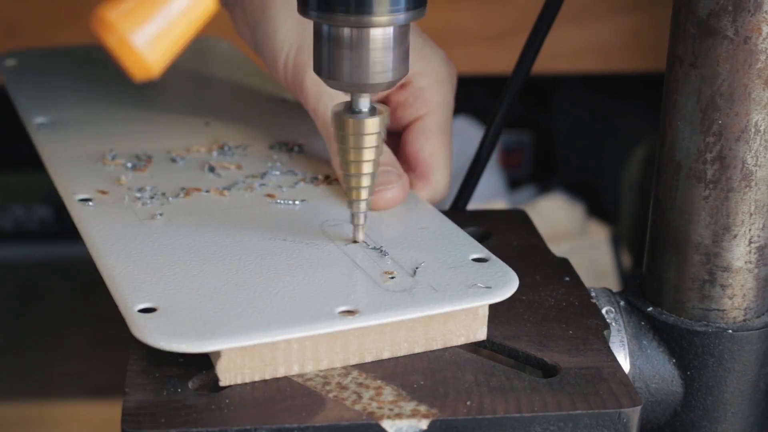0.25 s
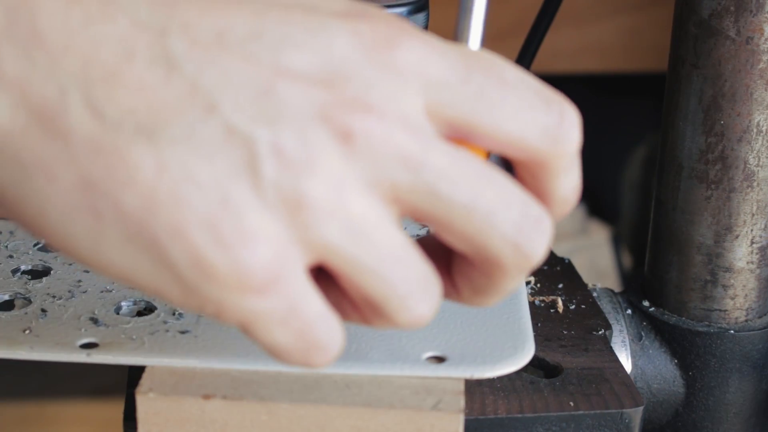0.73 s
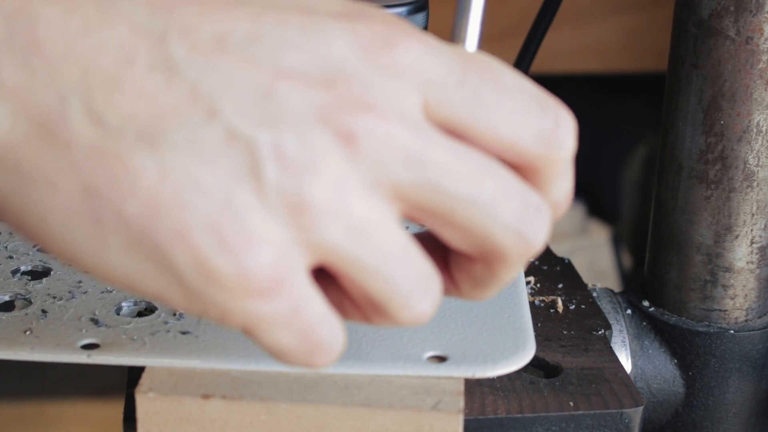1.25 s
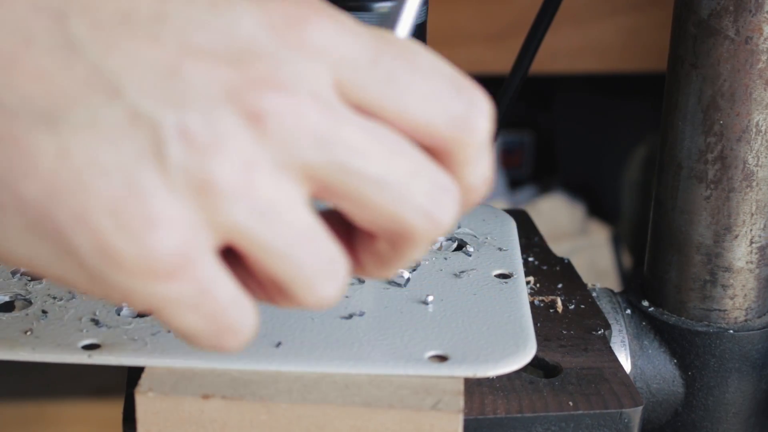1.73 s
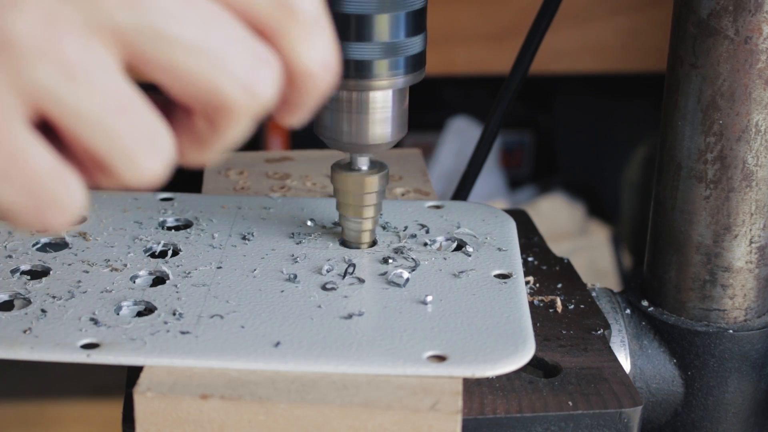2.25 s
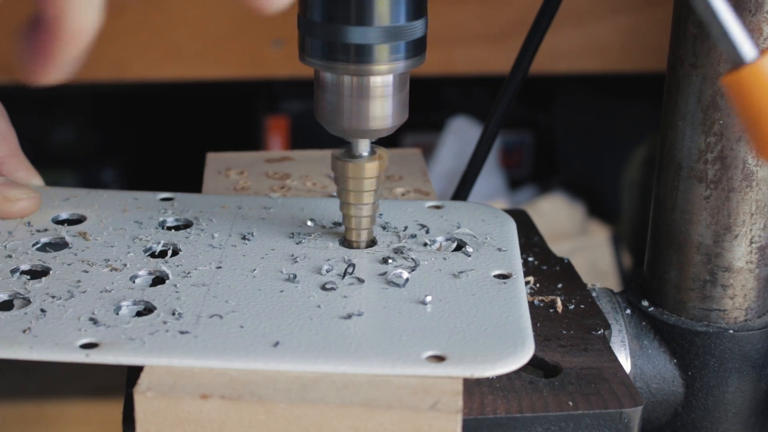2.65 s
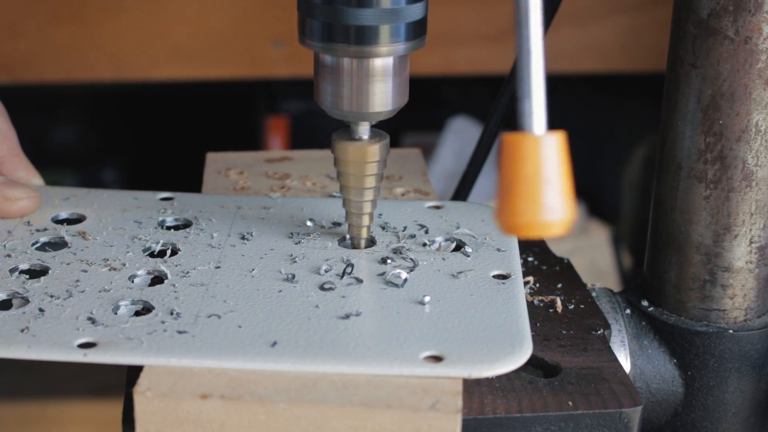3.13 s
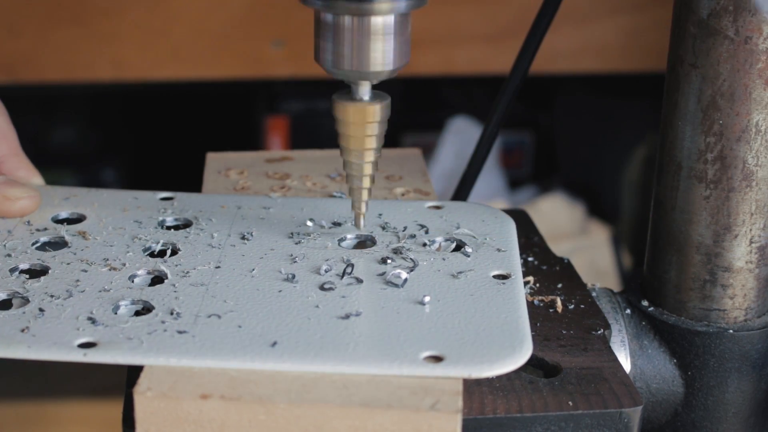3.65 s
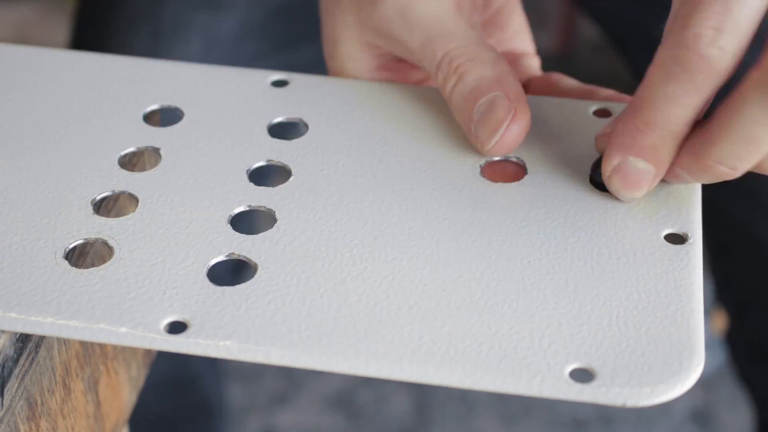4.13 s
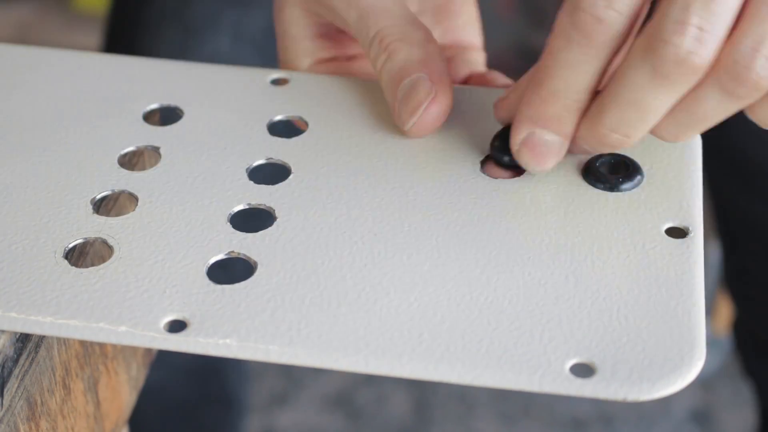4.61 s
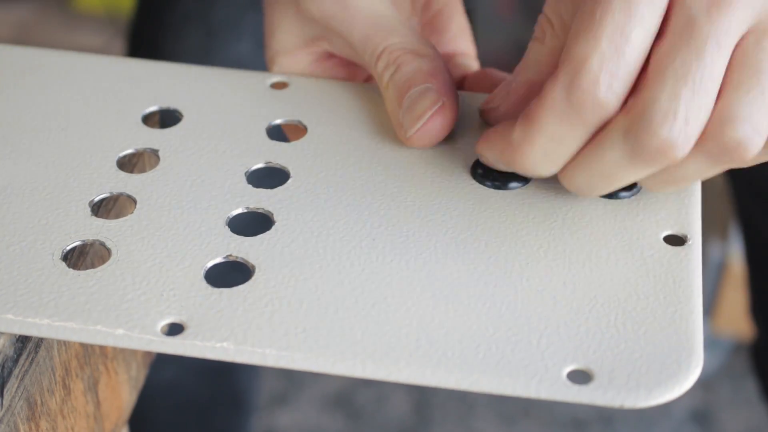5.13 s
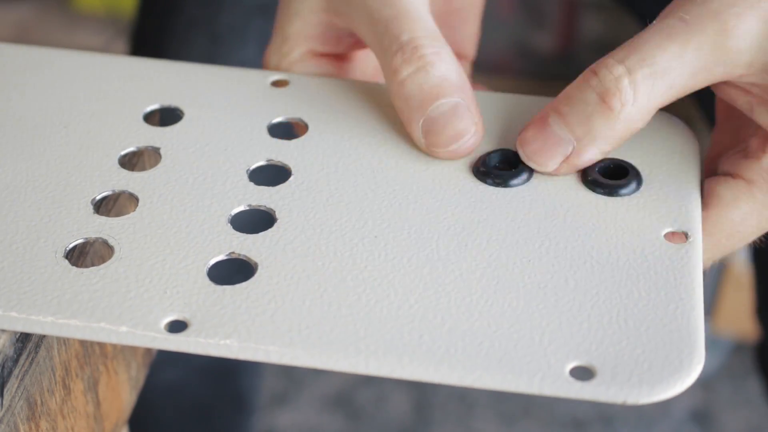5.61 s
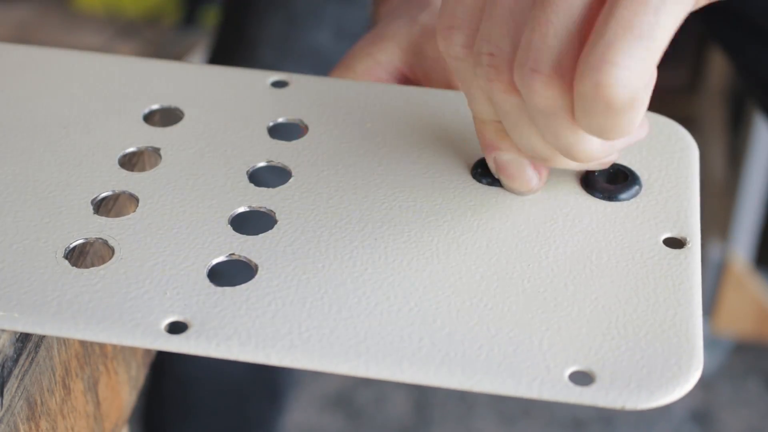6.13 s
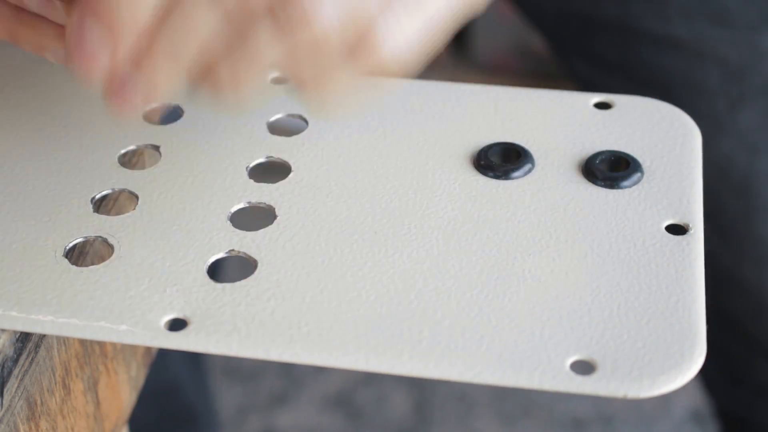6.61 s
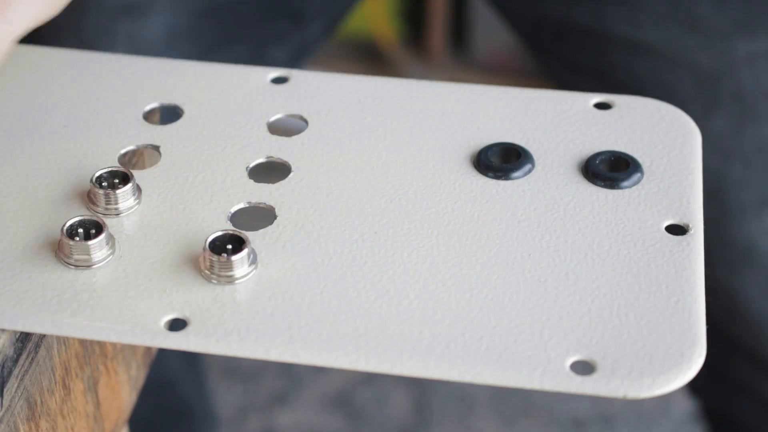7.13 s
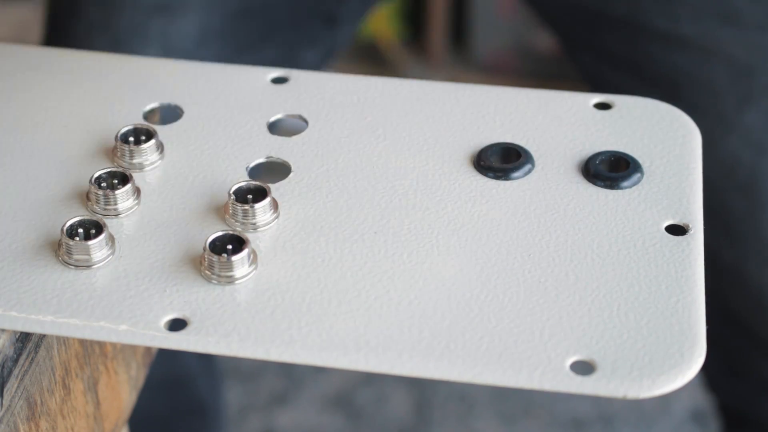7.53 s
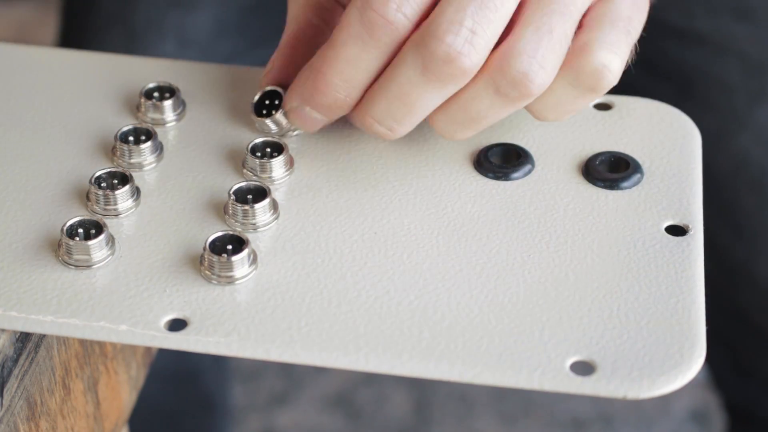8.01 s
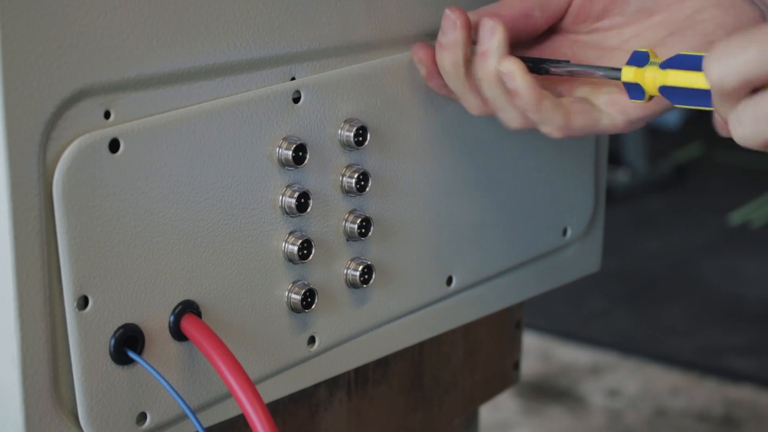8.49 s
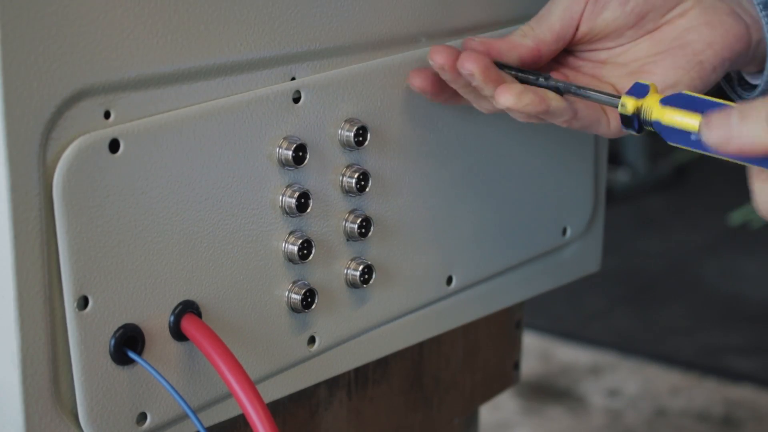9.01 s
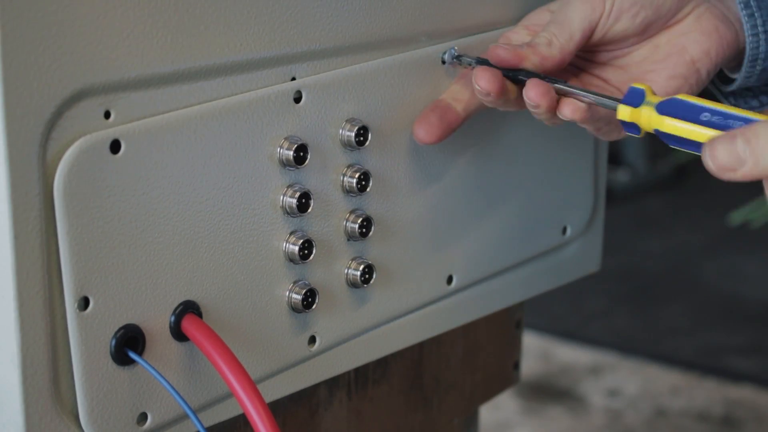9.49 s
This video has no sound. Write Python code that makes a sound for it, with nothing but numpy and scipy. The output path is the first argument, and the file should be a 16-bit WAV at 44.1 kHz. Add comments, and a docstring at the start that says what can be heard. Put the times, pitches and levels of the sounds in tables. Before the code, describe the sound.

In a small workshop, closely miked, a thin high whine gives way to a humming drill press. Its stepped bit tears harshly through thin steel in fast pulses, then chatters and rattles in the hole. The machine cuts off abruptly. In near-quiet come faint dry rubber ticks, a spaced run of bright metal clinks, and one hard knock on a hollow steel cabinet, followed by soft dull bumps.

```python
"""A small workshop with a bench drill press: a brief high whine, then the motor hums while a stepped bit
tears through a thin steel panel and rattles in the hole, until the machine sound ends abruptly.
Rubber grommets tick into the holes, metal sockets clink into place, and the panel knocks on a hollow cabinet.
Tones are sine waves; scraping, tearing and knocking are bursts of grainy noise coloured by the objects they shake."""
import sys
import numpy as np
from scipy import signal
from scipy.fft import rfft, irfft
from scipy.io import wavfile

SR = 44100
rng = np.random.default_rng(int(sys.argv[2]) if len(sys.argv) > 2 else 0)


def int16_out(signal):
    """Quantize to a 16-bit WAV file."""
    q = np.round(np.clip(np.atleast_2d(signal).T, -1, 1) * 32767)
    wavfile.write(sys.argv[1], SR, q.astype(np.int16))


N = 429959
T = np.arange(N) / SR   # time of every sample [s]

WHINE_END_S, DRILL_END_S, CABINET_S = 0.36, 4.082, 8.39
TURN_S = 0.1041        # one turn of the spindle
BIT_CLEAR_S = 3.85     # the bit is lifted clear of the hole

# Running machine: (time [s], hum level [dB rms], bearing noise level before trim [dB])
MACHINE_LEVELS = [(0.38, -46, -41), (0.75, -49, -35), (1.2, -58.5, -41), (1.47, -54, -45), (1.75, -50, -41),
                  (1.95, -46.5, -39.5), (3.5, -48, -39.5), (3.93, -53, -41), (4.06, -48.5, -40)]
# Resonances of the cast frame: (frequency [Hz], width [Hz], relative level [dB])
FRAME_MODES = [(177, 90, -10), (232, 32, -7), (462.3, 140, 1), (604.6, 72, -4.5), (904.3, 13, -13.5),
               (1536, 30, -15)]
# How hard the edge scrapes the steel as the bit is fed: (time [s], level [dB])
FEED = [(0.66, -55.5), (0.695, -44.5), (0.735, -42.5), (0.765, -25.5), (1.15, -25), (1.335, -28),
        (1.36, -38), (1.395, -37.5), (1.43, -54)]
# Colour of the bit and the torn edge: (frequency [Hz], relative level per Hz [dB])
CUT_COLOUR = [(450, -35), (900, -10.5), (1600, -5.5), (2000, -7), (2900, -7), (3500, -8.5), (6200, -5.5),
              (8000, -12), (12000, -17), (16000, -36)]
# Colour of ticks, also used for scratches and hiss: (frequency [Hz], relative level per Hz [dB])
TICK_COLOUR = [(180, -47), (300, -8.5), (1740, 1.5), (2790, -2), (3410, 4.5), (5370, -6), (8580, -2),
               (10900, 0), (11800, -6), (14900, -3), (16500, -13)]


def from_db(db):
    """Decibels to gain."""
    return np.exp(np.asarray(db) * (np.log(10) / 20))


def unit(x):
    """Scale to rms 1."""
    return x / np.sqrt(np.mean(x ** 2) + 1e-20)


def in_time(rows):
    """Read each column of a timed table at every sample."""
    s, *columns = np.transpose(rows)
    return [np.interp(T, s, column) for column in columns]


def at_hz(points, hz):
    """Read a table on a log-frequency axis."""
    f, value = np.transpose(points)
    return np.interp(np.log(hz), np.log(f), value)


def between(start, end, fade=0.0019):
    """1 from start to end, with short ramps just inside both [s]."""
    rise = np.clip((T - start) / fade, 0, 1)
    fall = np.clip((end - T) / fade, 0, 1)
    return rise * fall


def drift(rate):
    """A smooth random wander with rms 1, heading for a new value `rate` times a second."""
    knots = rng.standard_normal(4000)
    return unit(np.interp(T * rate, np.arange(len(knots)), knots))


def grains(spread_db):
    """Dense tiny contacts: noise with rms 1 whose strength jumps every 32 samples (0.7 ms)."""
    size = from_db(spread_db * rng.standard_normal(N // 32 + 1))
    return unit(rng.standard_normal(N) * np.repeat(size, 32)[:N])


def lowpass(x, hz, order=2):
    """Causal low-pass; the tiny offset keeps silence from slowing the filter."""
    sos = signal.butter(order, min(hz, 0.45 * SR), fs=SR, output="sos")
    return signal.sosfilt(sos, x + 1e-18)


def highpass(x, hz):
    """Causal high-pass."""
    return signal.sosfilt(signal.butter(2, hz, "high", fs=SR, output="sos"), x)


def body(x, colour, modes=(), broad_db=0.0, size=8192):
    """Response of an object, scaled to unit energy: a broad colour with resonances standing out of it."""
    f = np.maximum(np.fft.rfftfreq(size, 1 / SR), 1)
    power = from_db(at_hz(colour, f) + broad_db) ** 2
    for hz, width, db in modes:
        power = power + (from_db(db) / (1 + ((f - hz) / width) ** 2 * 2)) ** 2
    # fold the cepstrum forward: the response then starts at once, with nothing before the blow
    cepstrum = irfft(np.log(power) / 2)
    cepstrum[1:size // 2] *= 2
    cepstrum[size // 2 + 1:] = 0
    response = irfft(np.exp(rfft(cepstrum)))
    return signal.oaconvolve(x, response / np.linalg.norm(response))[:N]


def pushes(times, levels_db, lengths, swell):
    """Force envelope of many contacts: each jumps up (or swells over its length) and dies away."""
    power, age = np.zeros(N), T[:SR // 4]
    for s, db, length in np.broadcast(times, levels_db, lengths):
        u, at = age / max(length, 1e-4), int(s * SR)
        shape = u * np.exp(1 - u) if swell else np.exp(-u)
        power[at:at + len(age)] += ((from_db(db) * shape) ** 2)[:N - at]
    return np.sqrt(power)


def tones(lines, waver_db):
    """Steady sine tones, each wavering a little in level and phase."""
    total = 0
    for hz, db in lines:
        level = np.sqrt(2) * from_db(db + waver_db * drift(22))
        phase = 2 * np.pi * (hz * T + rng.random()) + 0.28 * drift(6.3)
        total = total + level * np.sin(phase)
    return total


def shifting(x, depth_db, rate):
    """The point of contact wanders, so each band is excited more or less strongly from moment to moment."""
    out, below = 0, 0
    for hz in (1200, 2000, 2800, 3800, 5100, 6800, 9500, 19000):   # upper edge of each band
        upto = signal.sosfiltfilt(signal.butter(4, hz, fs=SR, output="sos"), x + 1e-18)
        out = out + (upto - below) * from_db(depth_db * drift(rate))
        below = upto
    return out


def workshop(x, wet_db, shrink=0.6):
    """Add the room's echo: a noise tail in bands, each dying at its own pace, the highest soonest."""
    # Time to fall by 60 dB, before `shrink` shortens it: (frequency [Hz], time [s])
    room_decay = [(100, 0.23), (300, 0.49), (1000, 0.36), (5000, 0.19), (15000, 0.016)]
    age, tail = T[:SR * 3 // 5], 0
    edges = np.geomspace(40, 18000, 10)
    for low, high in zip(edges, edges[1:]):
        sos = signal.butter(2, [low, high], "band", fs=SR, output="sos")
        band = signal.sosfilt(sos, rng.standard_normal(len(age)))
        decay_s = shrink * at_hz(room_decay, np.sqrt(low * high))
        tail = tail + band * np.exp(-np.log(1000) * age / decay_s)
    tail = tail * np.clip(age / 0.00043 - 1, 0, 1)   # the echo starts just after the direct sound
    return x + from_db(wet_db) * signal.oaconvolve(x, tail / np.linalg.norm(tail))[:N]


def catches():
    """The same catches come round every turn, following the feed: rows of (time, strength dB, swell time)."""
    # One flute bites hard, the other catches twice:
    # (time into the turn [s], level over the scrape [dB], swell time [s])
    flutes = [(0.0, 12, .0055), (.046, 7.5, .005), (.061, 6.5, .0035)]
    first_bite_s, jitter_s = 0.7085, 0.0006
    turns = np.arange(first_bite_s, FEED[-1][0], TURN_S)
    rows = [(turn + lag, db, swell) for turn in turns for lag, db, swell in flutes]
    s, over_db, swell_s = np.transpose(rows)
    strength_db = np.interp(s, *np.transpose(FEED)) + over_db
    late = rng.standard_normal(len(s))
    return np.column_stack([s + jitter_s * late, strength_db, swell_s])


def cutting():
    """Steel tears in tiny fractures; each bite of a flute is a surge of them, and the panel flexes and roars."""
    # The edge digs in and breaks through; two later rattles get a brighter steel edge:
    # (time [s], strength [dB], swell time [s])
    snaps = [(0.7421, -26.5, 0.0045), (1.3912, -31, 0.0014), (1.554, -36, 0.0032), (2.0731, -30, 0.0032)]
    # Resonances of bit and torn edge: (frequency [Hz], width [Hz], relative level [dB])
    cut_modes = [(1594, 60, -1.5), (2220, 160, -6), (2950, 120, -2), (4160, 92, -3), (4640, 120, -2.5),
                 (5210, 42, -5), (5700, 54, -3.5), (6200, 120, 0.5), (6500, 34, -5.5), (7380, 180, -7.5)]
    # Colour of the flexing panel: (frequency [Hz], relative level per Hz [dB])
    flex_colour = [(50, -69), (90, -36), (130, -17.5), (240, -10), (450, -4.5), (700, -4.5), (1000, -8),
                   (1500, -14), (2200, -41)]
    # Resonances of the flexing panel: (frequency [Hz], width [Hz], relative level [dB])
    flex_modes = [(232, 22, -9.5), (353, 65, -5), (410.2, 25, -1), (505, 37, 3.5), (700, 83, 3.5),
                  (895, 48, 1.5), (1130, 36, -4)]
    s, strength_db, swell_s = np.vstack([catches(), snaps]).T
    scrape = from_db(in_time(FEED)[0] + 1.5 * drift(120.1)) * between(0.58, 1.5, fade=0.03)
    bites = pushes(s, strength_db, swell_s, swell=True)
    # hypot adds the powers of the steady scrape and the bites
    tear_force = np.hypot(from_db(1.0) * scrape, bites)
    flex_force = np.hypot(from_db(-0.1) * scrape, from_db(-6.5) * bites)
    tearing = body(tear_force * grains(spread_db=2.5), CUT_COLOUR, cut_modes, broad_db=-0.5)
    flexing = body(flex_force * grains(spread_db=3.5), flex_colour, flex_modes, broad_db=-3.0)
    steel = shifting(tearing, depth_db=2.5, rate=60)
    return workshop(steel + highpass(flexing, 75), wet_db=-16)


def grazes():
    """Two uneven light contacts a turn, thudding with the frame's shaking: rows of (time, ring dB, thud dB)."""
    first_s, jitter_s, spread_db = 0.4105, 0.0024, 1.5
    s = np.arange(first_s, BIT_CLEAR_S, TURN_S / 2)
    late, ring, thud = rng.standard_normal((len(s), 3)).T
    shake_db = np.interp(s, T, in_time(MACHINE_LEVELS)[1])
    # the ring fades by 3 dB a second as the hole is worn smooth
    ring_db = -30 - 3 * (s - first_s) + spread_db * ring
    thud_db = -36.5 + shake_db - shake_db.mean() + spread_db * thud
    return np.column_stack([s + jitter_s * late, ring_db, thud_db])


def rattling():
    """The spinning bit chatters on the rim: a steel ring and a panel thud, with chips skittering around."""
    # Hardest knocks of bit on rim, before trims: (time [s], ring strength [dB], thud strength [dB])
    hard_knocks = [(0.417, -21.5, -28), (0.5247, -24, -29), (0.6544, -24, -36), (1.5553, -22.5, -37.5),
                   (1.7517, -28.5, -30), (1.869, -28.5, -35), (1.917, -26, -45), (2.0731, -27, -34.5),
                   (2.2378, -25.5, -48), (2.5467, -28, -36), (2.709, -28.5, -39), (2.7566, -32, -33),
                   (2.8579, -21.5, -45), (2.8764, -27, -30), (3.1278, -30, -33), (3.2266, -25.5, -40),
                   (3.2802, -21, -33.5), (3.3217, -28, -33.5), (3.367, -33, -28), (3.446, -21.5, -26),
                   (3.693, -30, -28), (3.7102, -28.5, -29), (3.791, -31, -30.5)]
    # Colour of the steel ring: (frequency [Hz], relative level per Hz [dB])
    ring_colour = [(530, -29), (1000, -9.5), (1600, -12), (2400, -14), (3000, -14), (3400, -20),
                   (6000, -14), (9000, -21.5), (12000, -30), (16000, -45)]
    # Resonances of the steel ring: (frequency [Hz], width [Hz], relative level [dB])
    ring_modes = [(1600, 120, -8.5), (2680, 120, -10.5), (2965, 130, -3.5), (3678, 320, -14),
                  (4790, 180, -6), (5360, 300, -9.5), (6150, 200, -8.5), (7230, 120, -15),
                  (7970, 340, -16.5), (11800, 400, -24.5)]
    # Colour of the thud: (frequency [Hz], relative level per Hz [dB])
    thud_colour = [(130, -43.5), (220, -14), (417, -0.5), (602, -1.5), (886, -5.5), (1390, -15),
                   (1580, -13), (2500, -18), (3250, -51.5), (5500, -120)]
    # Loose chips brushed around by the bit: (time [s], level before trim [dB])
    swarf = [(0.38, -43.5), (0.6, -58.5), (1.7, -53.5), (2.05, -44.5), (2.12, -57.5), (3.2, -61),
             (3.5, -48.5), (3.67, -58), (3.78, -47.5), (3.88, -63)]
    s, ring_db, thud_db = np.vstack([hard_knocks, grazes()]).T
    swarf_db = in_time(swarf)[0]
    # lighter, duller taps fall at random between the loud ones, harder where chips lie thick
    tap_s = rng.uniform(WHINE_END_S, BIT_CLEAR_S, size=45)
    tap_db = np.interp(tap_s, T, swarf_db) + 6.5 + 2.7 * rng.standard_normal(len(tap_s))
    taps = lowpass(pushes(tap_s, tap_db, 0.0038, swell=True) * grains(spread_db=2.5), 4500)
    contacts = pushes(s, ring_db - 13.5, 0.003, swell=True) * grains(spread_db=2.5)
    ring = body(contacts + taps, ring_colour, ring_modes, broad_db=-7.5)
    thud_force = pushes(s, thud_db - 3.5, 0.0066, swell=True) * grains(spread_db=2.0)
    thud = body(thud_force, thud_colour, FRAME_MODES, broad_db=3.5)
    chip_level = from_db(swarf_db - 3.5 + 3.0 * drift(70))
    chips = body(chip_level * grains(spread_db=4.5), CUT_COLOUR, ring_modes, broad_db=-3.0)
    steel = shifting(ring + chips, depth_db=3.5, rate=40)
    return workshop(steel + thud, wet_db=-12)


def motor():
    """Mains hum, the belt's low throb, running tones, a faint spindle squeal, and bearings shaking the frame."""
    # Running tones before a 1 dB cut: (frequency [Hz], level [dB rms])
    motor_tones = [(242.2, -61.5), (425.3, -53.5), (597.5, -51.5), (742.9, -53), (888.2, -56)]
    # Colour of the bearing noise: (frequency [Hz], relative level per Hz [dB])
    bearing_colour = [(15, -49), (25, -19.5), (64, -25.5), (97, -18), (270, -16.5), (326, -4.5), (373, -5),
                      (607, -4.5), (677, -8), (911, -6.5), (1130, -16.5), (2160, -20), (3340, -37.5),
                      (5280, -33.5), (16000, -51)]
    # Faint squeal of the spindle: (frequency [Hz], level [dB rms])
    squeal = [(5233, -72.5)]
    mains_hum_hz, belt_hz = 100.0, 43
    hum_db, bearing_db = in_time(MACHINE_LEVELS)
    hum = np.sqrt(2) * from_db(hum_db) * np.sin(2 * np.pi * mains_hum_hz * T)
    belt = from_db(-67.5) * np.sin(2 * np.pi * belt_hz * T)
    bearing_level = from_db(bearing_db - 1.58 + 1.0 * drift(35))
    bearings = bearing_level * body(grains(spread_db=3.5), bearing_colour, FRAME_MODES, broad_db=3.5)
    running = from_db(-1.0) * tones(motor_tones, waver_db=1.5)
    return hum + belt + bearings + running + tones(squeal, waver_db=3.0)


def whine():
    """A thin 1 kHz whine with higher tones over a bright, grainy hiss and a faint hum."""
    # Whine: (frequency [Hz], level [dB rms])
    whine_tones = [(1001, -48.5), (1997, -57.5), (3994, -53.5), (4996, -51), (5992, -54.5), (6460, -57),
                   (7413, -53.5), (9415, -60), (9857, -74), (10164, -72), (10314, -58)]
    # Colour of the hiss: (frequency [Hz], relative level per Hz [dB])
    hiss_colour = [(60, -50), (200, -27), (260, -33), (320, -22), (400, -26), (500, -26), (850, -27),
                   (1000, -13), (1200, -22), (2000, -15.5), (5000, -8.5), (10000, -18), (12000, -23.5),
                   (16000, -24)]
    # Faint hum: (frequency [Hz], level [dB rms])
    hum_tones = [(245, -76.5), (400, -69.5)]
    # Hiss before a 1.5 dB cut: (time [s], level [dB])
    hiss_levels = [(0.0, -41), (0.126, -43), (0.34, -37)]
    hiss = from_db(in_time(hiss_levels)[0] - 1.5) * body(grains(spread_db=3.5), hiss_colour)
    hum = tones(hum_tones, waver_db=0.5)
    return (tones(whine_tones, waver_db=1.5) + hiss + hum) * between(-1, WHINE_END_S)


def touches(count):
    """Light, dull finger contacts, loosely spread over the work: rows of (time, strength dB, brightness dB)."""
    start_s, end_s = 5.08, 6.55
    s = start_s + (end_s - start_s) * (np.arange(count) + rng.random(count)) / count
    strength_db = -49.5 + 0.5 * rng.standard_normal(count)
    return np.column_stack([s, strength_db, np.full(count, -5.5)])


def grommets():
    """Rubber lips and fingernails snap over the hole edges: very short, dry ticks amid a faint rubbing."""
    # Grommets snapping in, before trims: (time [s], strength [dB], top over middle [dB])
    snap_ins = [(4.465, -45.5, -5.5), (4.535, -39.5, 2), (5.013, -40, 4), (5.035, -38.5, 1),
                (5.177, -47.5, -5), (5.342, -46, -0.5), (5.438, -46.5, -6), (5.478, -45, 1.5),
                (5.809, -43.5, 12), (5.946, -48, -2), (5.984, -44.5, -0.5), (6.03, -39, 3), (6.087, -40, 1),
                (6.277, -44, 0), (6.31, -42.5, 1)]
    # The panel's short ring under a tick: (frequency [Hz], width [Hz], relative level [dB])
    tick_modes = [(1430, 480, -14), (3650, 560, -1.5), (6550, 1200, 14), (10300, 990, 13.5)]
    s, strength_db, bright_db = np.vstack([snap_ins, touches(count=12)]).T
    snap = grains(spread_db=5.0)
    middle = lowpass(snap, 11000)
    top = snap - middle
    middle_force = pushes(s, strength_db - 6 - bright_db / 2, 0.0031, swell=False)
    top_force = pushes(s, strength_db - 4.5 + bright_db / 2, 0.0019, swell=False)
    ticks = middle * middle_force + top * top_force
    rubbing = from_db(3 * drift(25)) * grains(spread_db=6.5)
    fingers = from_db(-79.0) * lowpass(rubbing, 7000, order=1) * between(5.0, 6.55, fade=0.096)
    panel = body(ticks + fingers, TICK_COLOUR, tick_modes, broad_db=15.0)
    return workshop(panel, wet_db=-12.0, shrink=0.26)


def sockets():
    """Small steel sockets clink on the rim, bounce into their seats and rock; then a hand bumps the panel."""
    # Socket clinks: each seating, plus a second clink of the first socket at 6.766 s;
    # strengths before a 10.5 dB cut:
    # (time of main clink [s], main clink [dB], contact just before [dB], rocking afterwards [dB])
    clink_rows = [(6.7462, -33.5, -38.5, -53.5), (6.766, -32, -55, -65), (6.9446, -29, -46, -59.5),
                  (7.1457, -32, -36, -64), (7.3405, -34, -46, -43), (7.517, -27.5, -58, -39.5),
                  (7.687, -28, -59, -65), (7.8522, -31, -46.5, -52), (8.0237, -32, -59, -51),
                  (8.1597, -36.5, -37.5, -60)]
    # Colour of a clink: (frequency [Hz], relative level per Hz [dB])
    clink_colour = [(350, -54.5), (600, -35), (1180, -20), (3400, -11), (5080, -14.5), (6790, -6),
                    (8130, -11.5), (9740, 0), (15600, -4), (16500, -9)]
    # Resonances of a socket on the panel: (frequency [Hz], width [Hz], relative level [dB])
    clink_modes = [(1150, 210, -14), (2580, 340, -13), (3670, 600, -11.5), (7100, 850, -6), (9600, 670, -5),
                   (12100, 870, -1.5)]
    # A hand bumps the loose panel: (time [s], strength [dB], swell time [s])
    hand_bumps = [(8.262, -68, 0.0052), (8.281, -45, 0.0017), (8.305, -66, 0.0033), (8.364, -57.5, 0.0081)]
    # Colour of a bump: (frequency [Hz], relative level per Hz [dB])
    bump_colour = [(70, -17.5), (180, -2), (400, -1.5), (700, -7), (1300, -18.5), (2500, -33), (8000, -33)]
    rim_lead_s, bounce_s, rock_s = 0.0157, 0.0049, 0.047   # before, after and after the main clink
    s, main_db, rim_db, rock_db = np.transpose(clink_rows)
    times = np.concatenate([s - rim_lead_s, s, s + bounce_s, s + rock_s])
    strength_db = np.concatenate([rim_db, main_db, main_db - 6.5, rock_db])
    contacts = pushes(times, strength_db - 10.5, 0.0014, swell=True) * grains(spread_db=4.5)
    clinks = body(contacts, clink_colour, clink_modes, broad_db=-5.0)
    s, db, swell_s = np.transpose(hand_bumps)
    bumps = body(pushes(s, db, swell_s, swell=True) * grains(spread_db=3.0), bump_colour)
    return workshop(clinks + bumps, wet_db=-8.0, shrink=0.32)


def cabinet():
    """Each blow cracks and sets the hollow sheet-steel box ringing; soft touches reach only its low modes."""
    # Panel against cabinet, strength before a 22.5 dB boost:
    # (time [s], strength [dB], hardness as a low-pass cut-off [Hz], chatter decay time [s])
    blows = [(8.485, -18, 9000, 0.0068), (8.775, -42.5, 199, .003), (9.134, -63, 300, 0.0064),
             (9.189, -51, 398, 0.024), (9.315, -47, 200, .003), (9.574, -43, 130, 0.0045),
             (9.61, -47.5, 169, .003), (9.686, -42, 506, 0.034)]
    # Main resonances of the box: (frequency [Hz], width [Hz], relative level [dB])
    cabinet_modes = [(223, 43, -2), (236.8, 4.6, 2.5), (352, 16, -2.5), (645, 11.7, -7.5),
                     (1045, 150, -12.5), (1510, 36, -24), (2300, 61, -27), (2440, 130, -15.5),
                     (3350, 150, -19), (4450, 150, -28), (5900, 110, -16)]
    # Its dense lesser resonances: (frequency [Hz], relative level per Hz [dB])
    knock_colour = [(30, -66), (60, -50), (105, -11), (250, -7), (420, -11), (600, -21), (800, -23.5),
                    (1100, -21.5), (2500, -22.5), (4000, -31), (6000, -35), (11000, -37.5), (16000, -45.5)]
    # Screwdriver tip on a screw head: (time [s], strength [dB], swell time [s])
    tip_scratches = [(9.057, -75.5, 0.0073), (9.178, -67, 0.009), (9.675, -58, .012)]
    force, age = np.zeros(N), T[:SR // 2]
    for s, db, hard_hz, contact_s in blows:
        chatter = rng.standard_normal(len(age)) * np.exp(-age / contact_s)
        chatter /= np.linalg.norm(chatter)
        # one clean push moves the walls; the edges chatter against them, mostly above that
        push = lowpass(0.98 * (age == 0), 550)
        blow = push + 0.51 * lowpass(chatter, 390) + 1.12 * highpass(chatter, 480)
        at = int(s * SR)
        force[at:at + len(age)] += (from_db(db) * lowpass(blow, hard_hz))[:N - at]
    knocks = from_db(22.5) * body(force, knock_colour, cabinet_modes)
    knocks = highpass(knocks, 90)   # thin walls radiate little bass
    s, db, swell_s = np.transpose(tip_scratches)
    scratches = body(pushes(s, db, swell_s, swell=True) * grains(spread_db=1.0), TICK_COLOUR)
    return workshop(knocks + scratches, wet_db=-5.5)


def background():
    """Quiet air with a thin steady whistle and a far-off tone, after a fading hiss; a rumble by the cabinet."""
    # Colour of the quiet air: (frequency [Hz], relative level per Hz [dB])
    air_colour = [(35, -47), (60, -9.5), (1040, 0.5), (4220, -7.5), (4530, -7.5), (5210, -9.5), (9350, -11),
                  (16000, -15.5)]
    # Colour of the deeper rumble beside the cabinet: (frequency [Hz], relative level per Hz [dB])
    corner_colour = [(20, -29.5), (30, -10), (70, -0.5), (150, -0.5), (230, -5.5), (400, -11), (800, -17),
                     (3000, -21.5), (6000, -20), (16000, -28)]
    # Faint far-off rising tone: (time [s], frequency [Hz], peak level [dB])
    far_tone = [(4.58, 450, -89), (4.68, 488, -72), (4.75, 519.4, -67), (4.80, 540, -81), (4.86, 580, -95)]
    air = from_db(-70) * body(rng.standard_normal(N), air_colour)
    whistle = from_db(-82) * np.sin(2 * np.pi * 4577 * T)
    far_hz, far_db = in_time(far_tone)
    far = from_db(far_db) * np.sin(2 * np.pi * np.cumsum(far_hz) / SR) * between(4.55, 4.9)
    quiet = (air + whistle + far) * between(DRILL_END_S, CABINET_S + 0.033, fade=0.046)
    hiss_force = pushes(DRILL_END_S, -59.5, 0.057, swell=False)
    fading_hiss = body(hiss_force * grains(spread_db=5.0), TICK_COLOUR)
    corner = from_db(-65.5) * body(rng.standard_normal(N), corner_colour)
    return quiet + fading_hiss + corner * between(CABINET_S, 20, fade=0.023)


def scene():
    """The whine and the drilling, then the quiet fitting work."""
    drill = (cutting() + rattling() + motor()) * between(WHINE_END_S, DRILL_END_S)
    return (drill + whine() + grommets() + sockets() + cabinet() + background())[None]


def record(dry):
    """The highest peaks are clipped; everything above 16 kHz is cut steeply."""
    sos = signal.ellip(10, 0.1, 70, 16000, fs=SR, output="sos")
    return signal.sosfilt(sos, np.clip(dry, -0.85, 0.85))


dry = scene()
out = record(dry)
int16_out(out)
```